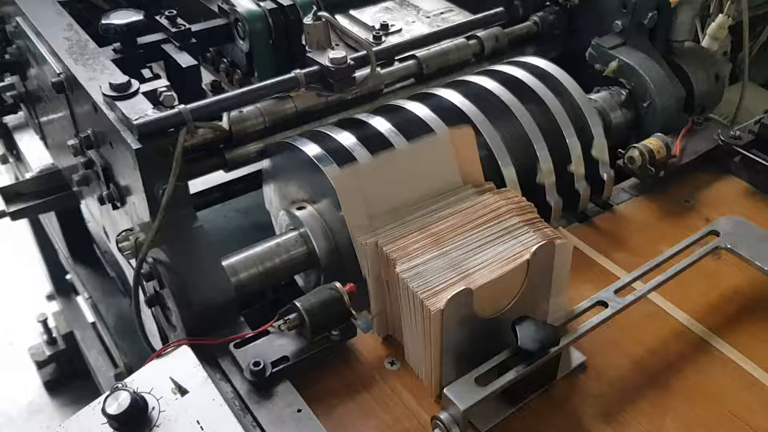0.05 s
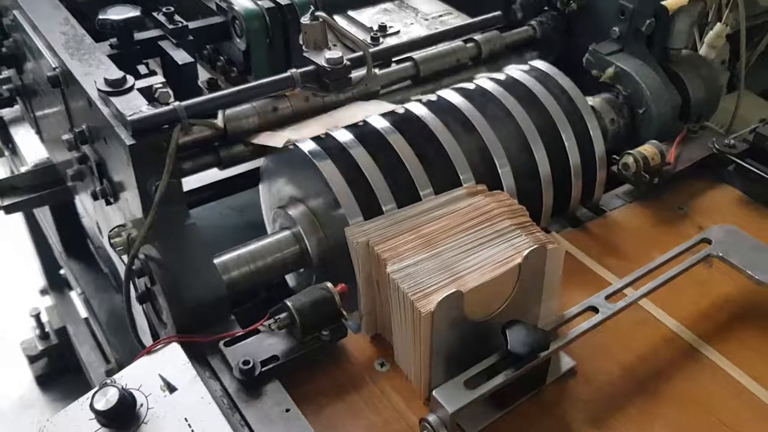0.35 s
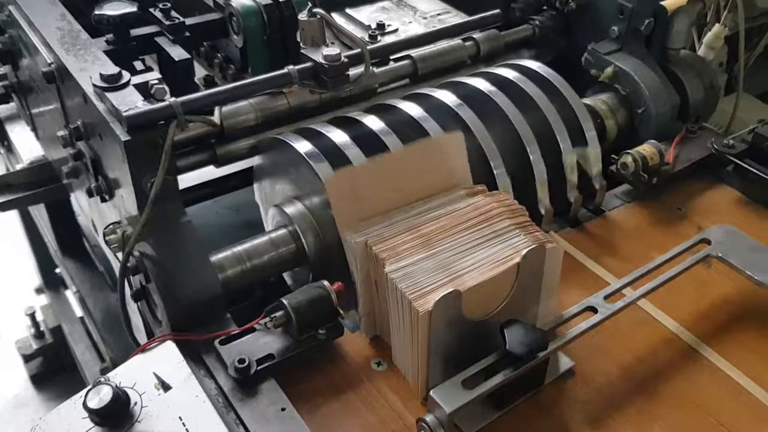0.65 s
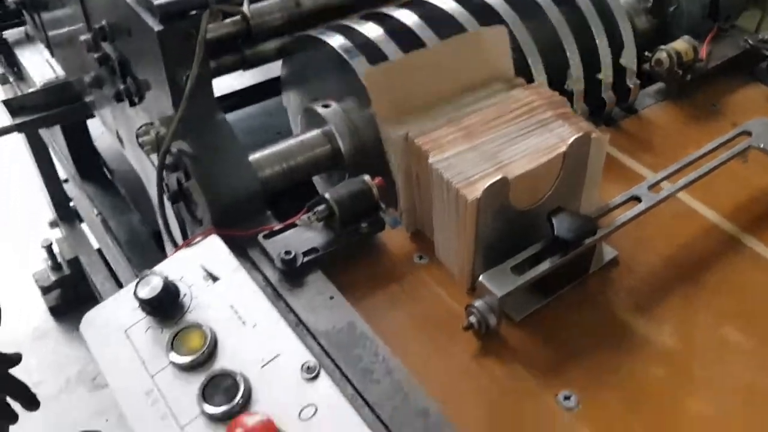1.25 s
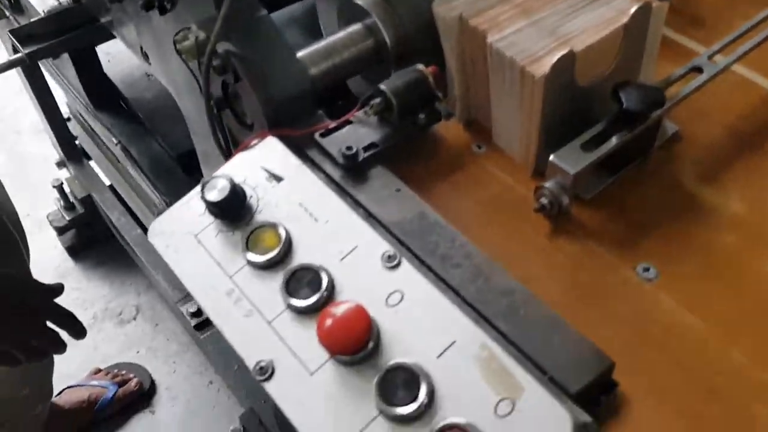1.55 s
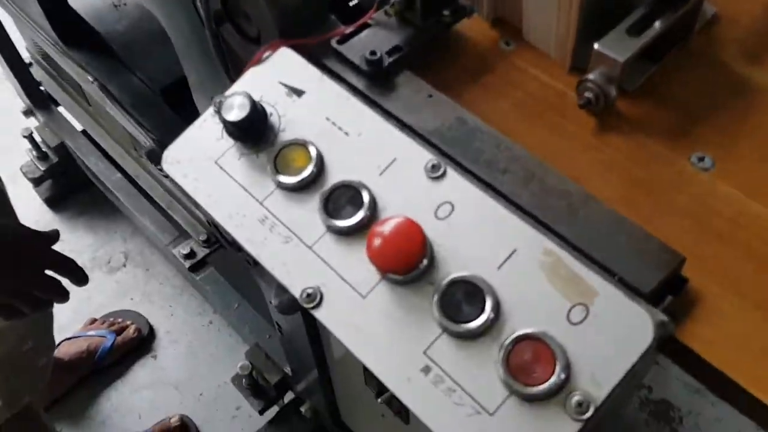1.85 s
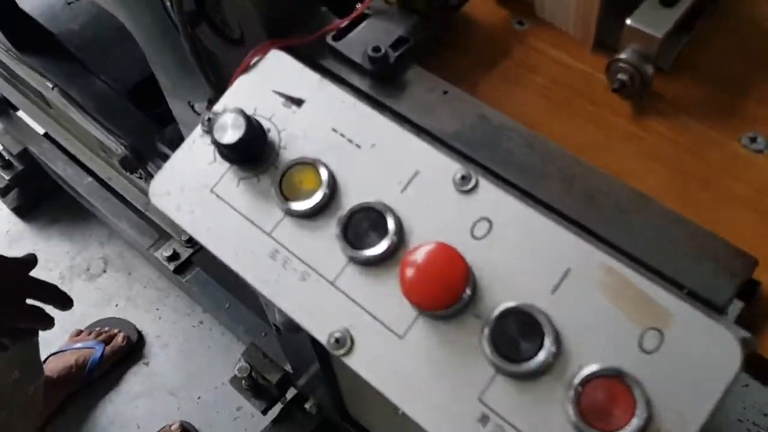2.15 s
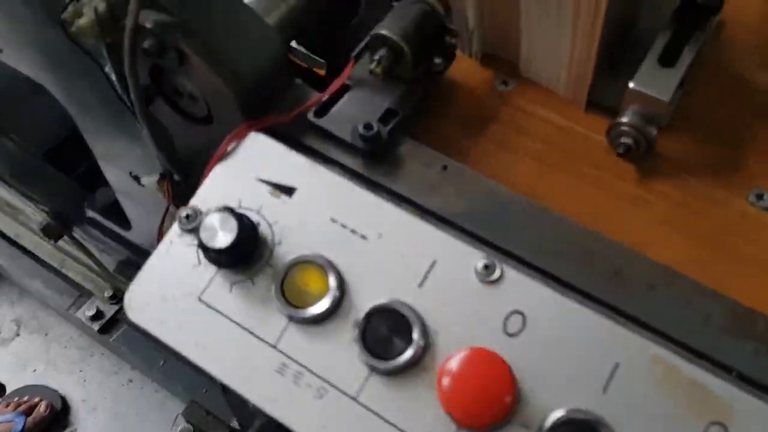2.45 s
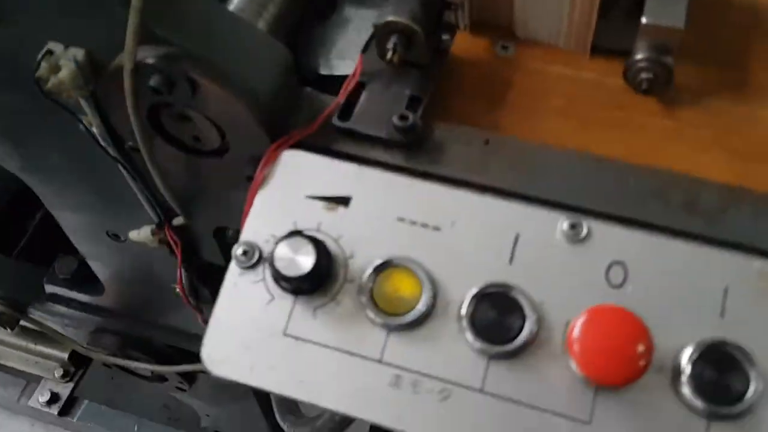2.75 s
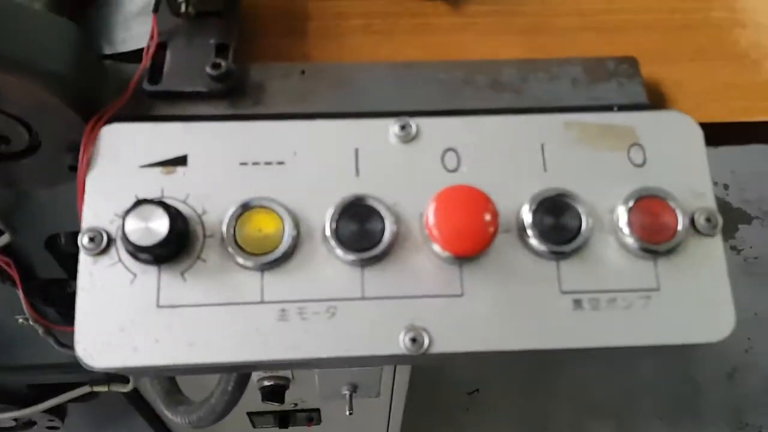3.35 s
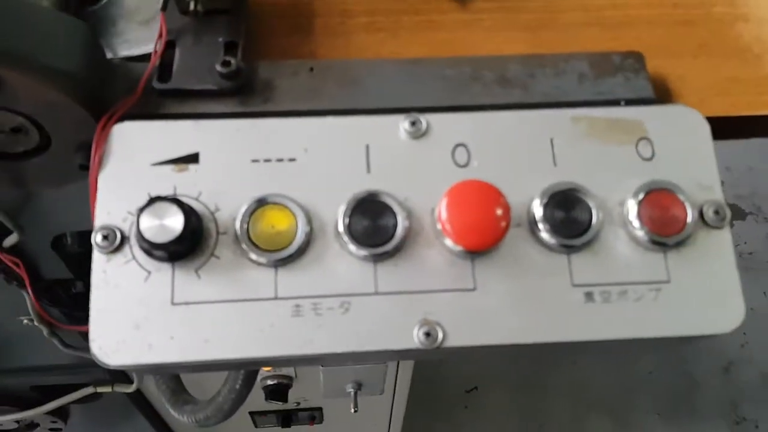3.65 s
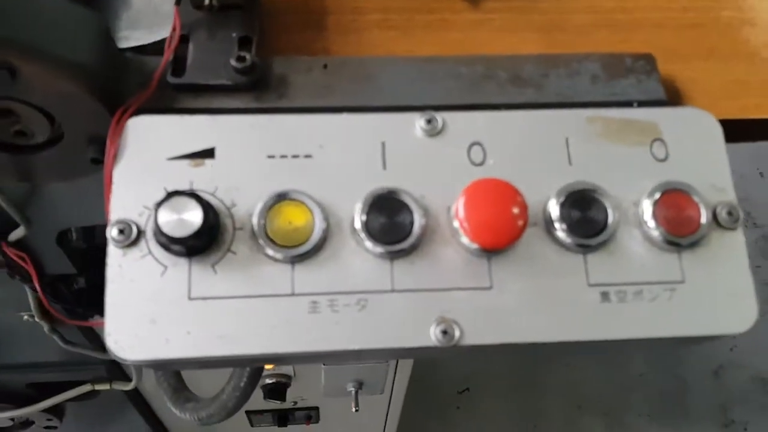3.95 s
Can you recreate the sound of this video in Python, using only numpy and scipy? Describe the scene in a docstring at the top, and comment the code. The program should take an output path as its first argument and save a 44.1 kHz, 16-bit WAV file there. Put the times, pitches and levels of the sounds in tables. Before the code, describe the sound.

A paper-feeding machine runs with regular steel clacks, rushes of air and a steady motor hum.

```python
"""An envelope pasting machine runs in a workshop, taking one paper blank per turn of its drum.
We cut in on the tail of a clack. In each turn paper brushes the guides, suction air rushes and the blank
scrapes off the stack while the vacuum pump's hum swells; levers tick, and a rattling steel clack follows.
Motor, frame rumble and leaking air go on throughout. About halfway in, the microphone drifts from the
drum to the control panel, and the drum end slips to the left."""
import sys
import numpy as np
from scipy import signal
from scipy.fft import rfft, irfft
from scipy.io import wavfile
from scipy.ndimage import uniform_filter1d, map_coordinates

SR = 44100
rng = np.random.default_rng(int(sys.argv[2]) if len(sys.argv) > 2 else 0)


def wrap_up_sound(samples):
    """Save the sound to the file named by the first command line argument, as 16-bit audio."""
    columns = np.atleast_2d(samples).T
    # keep every value between -1 and 1, then stretch to whole-number steps
    tamed = np.clip(columns, -1, 1)
    steps = np.round(tamed * 32767).astype(np.int16)
    wavfile.write(sys.argv[1], SR, steps)


N = 176400
T = np.arange(N) / SR
BIN_HZ = np.arange(N // 2 + 1) * SR / N
LEAVE_DRUM_S, REACH_PANEL_S = 1.86, 2.94
AT_PANEL = np.clip((T - LEAVE_DRUM_S) / (REACH_PANEL_S - LEAVE_DRUM_S), 0, 1)


# The beat of the drum. Each row: clack time in seconds, contact trim in dB, ring trim in dB,
# ring pitch in Hz, then trims in dB for the air rush and the scrape that follow.
TURNS = [(0.093, 1, -2.5, 2160, -1, -4), (0.685, -1.5, -5.5, 2130, -1, -9),
         (1.2737, -2, -2, 2100, -2.5, -1), (1.865, 3, 0, 1780, -1.5, 1), (2.455, .5, 1.5, 1673, -0.5, 2),
         (3.047, 5, 0.5, 2284, -1.5, 0), (3.639, 2.5, -1, 2010, 0.5, 0.5)]
# The bright bite of the contact. Each row: frequency in Hz, relative level in dB.
CONTACT_COLOUR = [(700, -17), (1400, -6), (2100, 1), (3200, 2), (3800, 2), (4500, 3), (6000, -1.5),
                  (9000, -3), (11800, 4), (14000, 8), (16000, -2.5)]
# The metallic tail. Each row: frequency in Hz, relative level in dB.
RING_COLOUR = [(600, -21), (1100, 2.5), (1700, 3.5), (2300, 7.5), (3400, 2), (4400, 2), (6000, 0),
               (9000, -6), (16000, -10)]

def clacks():
    """A cluster of hard contacts a few milliseconds long, then the metal rings on with one mode on top."""
    contact = ring = mode = 0
    for at, contact_db, ring_db, hz, *_ in TURNS:
        contact += from_db(-12.5 + contact_db) * strike(at, rise_s=.0049, fall_s=.005)
        ring += from_db(-19.5 + ring_db) * strike(at, rise_s=.003, fall_s=.029)
        mode += from_db(-23.5 + ring_db) * strike(at, rise_s=.003, fall_s=.02) * np.sin(2 * np.pi * hz * T)
    rattle = steel(noise(CONTACT_COLOUR, clicks_per_s=5000), ripple_db=2.5, spacing_hz=160.5)
    metal = steel(noise(RING_COLOUR), ripple_db=4.5, spacing_hz=71.1)
    return contact * rattle + ring * metal + mode


# The hiss of the suction. Each row: frequency in Hz, relative level in dB.
RUSH_COLOUR = [(700, -17), (1500, -5.5), (2600, -6), (3900, -12.5), (5500, -5), (6900, -0.5), (8200, 1.5),
               (9200, -7), (12000, -2), (13200, 3.5), (14600, 2), (16000, 1)]
# Airy whistles that wander as the gap changes. Each row: centre in Hz, level in dB against the hiss.
WHISTLES = [(6400, -12.5), (7000, -13.5), (8100, -22.5), (12100, -14), (14500, -15)]

def suction():
    """A sagging, faintly whistling rush of air each time a blank is sucked onto the drum."""
    sag_db_per_s = 19
    rush = 0
    for at, *_, db, _ in TURNS:
        age = np.maximum(T - at - .3, 0)
        gate = plateau(age, rise_s=.021, hold_s=.14, release_s=.079)
        rush += from_db(-18 + db - sag_db_per_s * age) * gate
    jet = noise(RUSH_COLOUR, clicks_per_s=12000) + sum(from_db(db) * whistle(hz) for hz, db in WHISTLES)
    return rush * from_db(.79 * drift(70)) * jet


def whistle(hz, width_hz=150):
    """A narrow, wandering band of hiss in each port."""
    phase = 2 * np.pi * np.cumsum(hz * (1 + .02 * drift(3.3))) / SR
    return np.array([drift(width_hz) * np.cos(phase) + drift(width_hz) * np.sin(phase) for _ in range(2)])


# Swishes on the guides. Each row: offset from the clack in seconds, level in dB, half length in seconds.
BRUSHES = [(-.012, -22, 0.0056), (.031, -24, 0.013), (.123, -26.5, 0.021), (.222, -35, .022),
           (.262, -24.5, .011), (.290, -38, 0.0061)]
# The crisp top of a swish. Each row: frequency in Hz, relative level in dB.
BRUSH_COLOUR = [(1000, -19), (2500, 0.5), (4500, 2.5), (6200, -1), (9000, -4), (12000, 7.5), (16000, 6.5)]
# The midrange rasp of paper on paper. Each row: frequency in Hz, relative level in dB.
SCRAPE_COLOUR = [(700, -30), (1400, -13), (2000, -4.5), (2550, 0.5), (3100, 1.5), (3700, -7), (6000, -24)]

def paper():
    """The blank scrapes off the stack and brushes against the guides."""
    swish = each_turn(BRUSHES, lambda at, half: np.exp(-((T - at) / half) ** 2),
                      vary_db=3.4, jitter_s=.0017)
    brush = swish * noise(BRUSH_COLOUR, clicks_per_s=5000)
    pull = sum(from_db(-34.5 + db) * plateau(T - at - .28, rise_s=.028, hold_s=.17, release_s=.031)
               for at, *_, db in TURNS)
    scrape = pull * from_db(1.3 * drift(40)) * noise(SCRAPE_COLOUR, clicks_per_s=3000)
    return brush + scrape


# Lever taps, two a turn. Each row: start in seconds, level in dB.
TICKS = [(.570, -26.5), (.883, -27), (1.160, -23), (1.476, -29.5), (1.752, -24.5), (2.065, -29.5),
         (2.341, -25.5), (2.655, -29), (2.933, -25), (3.249, -33), (3.525, -24.5), (3.836, -24)]
# The dry click of a tap. Each row: frequency in Hz, relative level in dB.
TICK_COLOUR = [(400, -9), (1000, -2.5), (1700, 6), (2800, 2), (4000, -20), (8000, -14), (13000, -2),
               (16000, -16)]
# Stray pings. Each row: time in seconds, pitch in Hz, level in dB.
PINGS = [(2.110, 2450, -26), (2.735, 3290, -18)]

def levers():
    """Levers tap and small steel parts ping between the clacks."""
    taps = sum(from_db(db) * plateau(T - at, rise_s=.002, hold_s=.005, release_s=.005) for at, db in TICKS)
    pings = sum(from_db(db) * strike(at, rise_s=.0012, fall_s=.005) * np.sin(2 * np.pi * hz * T)
                for at, hz, db in PINGS)
    return taps * steel(noise(TICK_COLOUR, clicks_per_s=4000), ripple_db=2.5, spacing_hz=198) + pings


# The pump's overtones. Each row: harmonic number, level in dB at the drum, level in dB at the panel.
PUMP_HARMONICS = [(2, -42, -44.5), (4, -50.5, -46.5), (5, -46.5, -54.5), (6, -50.5, -50.5), (7, -53, -47),
                  (8, -50.5, -56)]

def pump(load):
    """The vacuum pump's hum swells and rises a little in pitch under load."""
    hz = 99.27 + 1.3 * load
    hum = from_db(-37 + 8 * load) * tone(hz, wander_hz=.23, flutter_db=.8)
    return hum + overtones(PUMP_HARMONICS, hz, wander_hz=.53)


# The bed of hiss. Each row: frequency in Hz, relative level in dB.
LEAK_COLOUR = [(800, -2.5), (1100, -1), (1600, 0.5), (2700, 2.5), (3800, -2), (4800, 0), (5800, 3.5),
               (6600, 6.5), (7500, -1.5), (8800, -0.5), (10500, -.5), (12200, 3.5), (14000, -2.5),
               (16000, -2)]

def leak():
    """Air leaks steadily, coloured by the steel around it."""
    level = from_db(-26 + .5 * drift(35))
    return level * steel(noise(LEAK_COLOUR, clicks_per_s=16000), ripple_db=2, spacing_hz=44.5)


# The low bed beside the drum. Each row: frequency in Hz, relative level in dB.
DRUM_RUMBLE = [(20, -30), (33, -45), (48, -21.5), (80, -5.5), (120, -10.5), (150, -2.5), (185, -4),
               (222, 5), (255, 2), (292, 7.5), (325, -18), (450, -9.5), (620, -3), (800, -7.5),
               (1100, -9.5), (2000, -26)]
# The low bed beside the panel. Each row: frequency in Hz, relative level in dB.
PANEL_RUMBLE = [(20, -30), (33, -29), (48, -5.5), (120, -8), (150, 1.5), (185, -4.5), (222, 7.5),
                (290, -1.5), (325, -12), (450, -3.5), (620, 0), (800, -3), (1100, -12), (2000, -20)]
# Cam knocks. Each row: time after the clack in seconds, level in dB, decay in seconds.
KNOCKS = [(.028, -32, .03), (.300, -34, 0.011), (.47, -37, .03), (.535, -30, .018)]
# The dull body of a knock. Each row: frequency in Hz, relative level in dB.
KNOCK_COLOUR = [(30, -27), (60, 0), (130, -12.5), (215, 4.5), (290, 6.5), (350, -13), (800, -12),
                (1600, -50)]

def frame(load):
    """The frame rumbles, a touch louder under load, and the cams knock on every turn."""
    rumble = (np.sqrt(1 - AT_PANEL) * from_db(-34) * noise(DRUM_RUMBLE, clicks_per_s=3000)
              + np.sqrt(AT_PANEL) * from_db(-35) * noise(PANEL_RUMBLE, clicks_per_s=3000))
    knocks = each_turn(KNOCKS, lambda at, fall: strike(at, .012, fall), vary_db=2.1, jitter_s=.0044)
    swell_db = load + 1.6 * drift(25.3)
    return rumble * from_db(swell_db) + knocks * noise(KNOCK_COLOUR)


# The motor's drone. Each row: multiple of the shaft speed (played rounded to a whole number),
# level in dB at the drum, level in dB at the panel.
SHAFT_HARMONICS = [(4.95, -53, -46), (6, -44.5, -49), (9.01, -50, -49), (10.03, -42, -41),
                   (12, -53.5, -52.5), (21.15, -52, -50.5), (24.42, -53, -43), (30.13, -55.5, -46.5)]

def motor(shaft_hz=29.42):
    """The motor drones on harmonics of its turning shaft."""
    return overtones(SHAFT_HARMONICS, shaft_hz, wander_hz=1.2)


# The thin sparkle of the linkage. Each row: frequency in Hz, relative level in dB.
CHATTER_COLOUR = [(2000, -14), (5000, -4), (8000, -4), (12000, -3), (16000, -3)]

def chatter(hits_per_s=45, fall_s=.003):
    """The loose linkage gives tiny bright ticks at random moments."""
    hits = (rng.random(N) < hits_per_s / SR) * rng.uniform(.4, 1.3, N)
    envelope = signal.lfilter([1], [1, -np.exp(-1 / (fall_s * SR))], hits + 1e-18)
    return from_db(-33) * envelope * noise(CHATTER_COLOUR, clicks_per_s=7200)


# How centred the noise sits. Each row: frequency in Hz, share of power common to both microphone ports.
PORT_LIKENESS = [(30, 0.28), (90, 1), (200, 0.91), (350, 0.93), (700, 0.45), (1400, 0.24), (3000, 0.37),
                 (8000, 0.39), (14000, 0.22)]

def noise(colour, clicks_per_s=SR):
    """Coloured random clicks (hiss when dense): a direct part in both ports plus diffuse room sound."""
    clicks = rng.standard_normal((3, N)) * (rng.random(N) < clicks_per_s / SR)
    bins = rfft(clicks)
    alike = np.clip(per_bin(PORT_LIKENESS), 0, .995)
    ports = np.sqrt(alike) * bins[0] + np.sqrt(1 - alike) * bins[1:]
    return rms_one(irfft(ports * from_db(per_bin(colour)), N))


def steel(x, ripple_db, spacing_hz):
    """The many close resonances of steel parts ripple the spectrum."""
    ripple = np.interp(BIN_HZ / spacing_hz, np.arange(N), np.clip(rng.standard_normal(N), -2, 2))
    return rms_one(irfft(rfft(x) * from_db(ripple_db * ripple), N))


def overtones(rows, base_hz, wander_hz):
    """Harmonics whose balance shifts on the way from drum to panel."""
    return sum(from_db(drum + (panel - drum) * AT_PANEL) * tone(round(k) * base_hz, wander_hz, flutter_db=2)
               for k, drum, panel in rows)


def tone(hz, wander_hz, flutter_db):
    """A slightly unsteady sine of rms near 1."""
    cycles = np.cumsum(hz + wander_hz * drift(8.5)) / SR + rng.random()
    return np.sqrt(2) * np.sin(2 * np.pi * cycles) * from_db(flutter_db * drift(6.3))


def each_turn(rows, shape, vary_db, jitter_s):
    """Envelope of contacts that come back on every turn, never quite alike."""
    envelope = 0
    for after, db, length in rows:
        for at, *_ in TURNS:
            louder, later = rng.standard_normal(2)
            envelope += from_db(db + vary_db * louder) * shape(at + after + jitter_s * later, length)
    return envelope


def strike(at, rise_s, fall_s):
    """Envelope that grows to a peak and dies away."""
    return np.exp(np.minimum((T - at) / rise_s, (at - T) / fall_s))


def plateau(t, rise_s, hold_s, release_s):
    """Attack, hold and release between 0 and 1."""
    return np.clip(np.minimum(t / rise_s, 1 - (t - rise_s - hold_s) / release_s), 0, 1)


def drift(rate_hz):
    """A smooth random wobble of rms 1."""
    return rms_one(irfft(rfft(rng.standard_normal(N)) / (1 + (BIN_HZ / rate_hz) ** 2), N))


def delayed(x, ms):
    """Play a sound a varying number of milliseconds late."""
    return map_coordinates(x, [np.arange(N) - ms * SR / 1000], order=5, mode="nearest")


def per_bin(points):
    """A (Hz, value) table read at every frequency."""
    hz, value = np.transpose(points)
    return np.interp(np.log(BIN_HZ + 1e-9), np.log(hz), value)


def from_db(db):
    """Decibels to gain."""
    return 10 ** (np.asarray(db) / 20)


def rms_one(x):
    """Scale to rms 1."""
    return x / np.sqrt(np.mean(x ** 2) + 1e-20)


# The drum's pull to the left. Each row: time in seconds, lag of the right port in milliseconds.
RIGHT_LAG = [(0, 0.03), (.7, 0.4), (2.2, 0), (3, 0.5), (4, 0.9)]

def scene():
    """The drum end of the machine moves to the left as the microphone travels."""
    turn_s, swell_at_s = .5908, TURNS[0][0] + .305
    load = plateau((T - swell_at_s) % turn_s, rise_s=.0688, hold_s=.1308, release_s=.2688)
    lag_ms = np.interp(T, *np.transpose(RIGHT_LAG))
    pan = from_db(np.outer([1, -1], AT_PANEL - .5))
    drum = pan * (leak() + suction() + paper() + clacks() + levers() + chatter())
    # the reflection off the feed table takes longer as the microphone moves
    echo_ms = np.interp(T, [0, 1.1, 3, 4], [2.14, 2.26, 3.4, 3.5])
    drum = [port + from_db(-14.5) * delayed(port, echo_ms) for port in drum]
    drive = pump(load) + motor() + frame(load)
    drive_lag_ms = .34 * lag_ms   # the drive lies more nearly ahead than the drum
    return np.array([drum[0] + drive[0], delayed(drum[1], lag_ms) + delayed(drive[1], drive_lag_ms)])


# The tone of the microphone's right port. Each row: frequency in Hz, gain in dB.
RIGHT_PORT_EQ = [(100, -1), (270, -0.34), (1200, 0.7), (3000, 2.5), (3800, -1), (5000, 4.5), (6100, 9),
                 (6700, 5), (7200, 1.5), (7800, -2), (8500, -13), (9500, -0.5), (11500, 3.5), (15000, -1)]

def record(dry):
    """The right port's colour, a limiter that ducks under the clacks, the cut-in and a top cut."""
    threshold_db, duck_share, release_db_per_s = -17.5, .21, 180
    cut_in_s, ceiling, cutoff_hz = .105, .8, 15800
    x = np.array([dry[0], irfft(rfft(dry[1]) * from_db(per_bin(RIGHT_PORT_EQ)), N)])
    power = uniform_filter1d(np.mean(x ** 2, axis=0), size=220)
    over_db = np.maximum(10 * np.log10(power + 1e-12) - threshold_db, 0)
    held_db = np.maximum.accumulate(over_db + release_db_per_s * T) - release_db_per_s * T
    x = x * from_db(-duck_share * held_db) * (T > cut_in_s)
    x = x / (1 + (x / ceiling) ** 6) ** (1 / 6)   # rounds the peaks
    return signal.sosfilt(signal.ellip(12, .1, 90, cutoff_hz, fs=SR, output="sos"), x)


dry = scene()
out = record(dry)
wrap_up_sound(out)
```